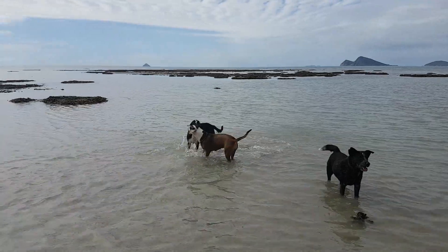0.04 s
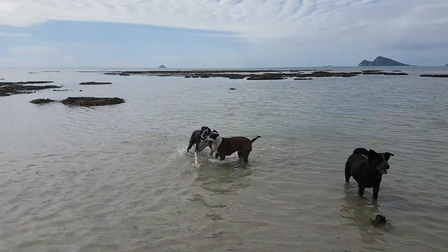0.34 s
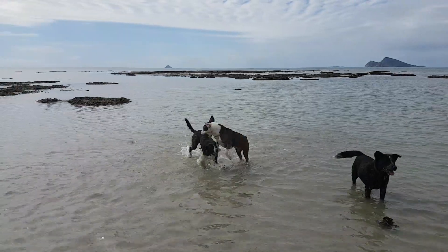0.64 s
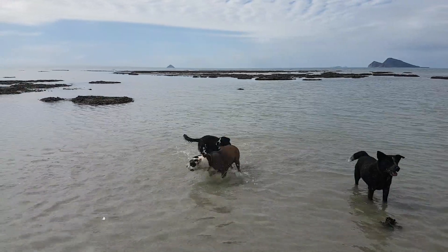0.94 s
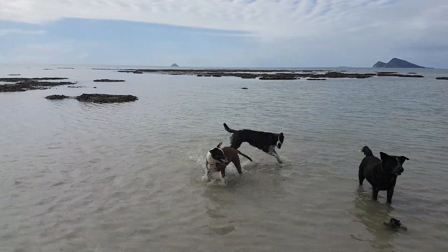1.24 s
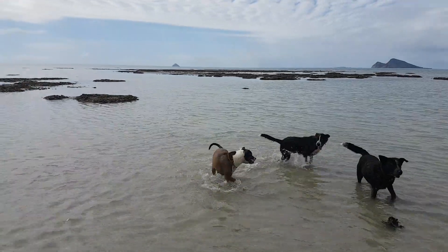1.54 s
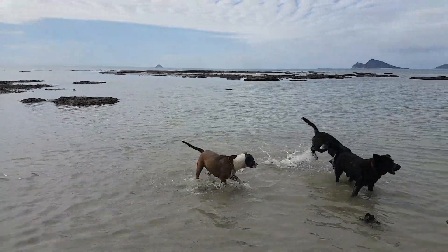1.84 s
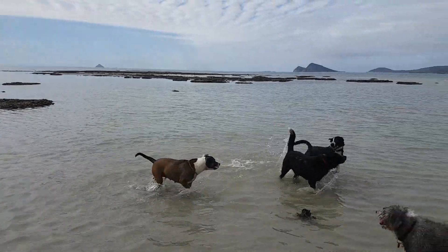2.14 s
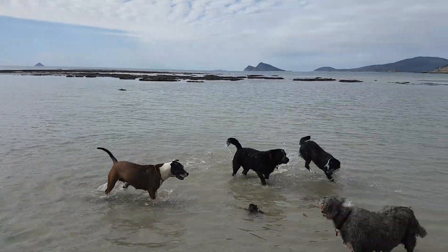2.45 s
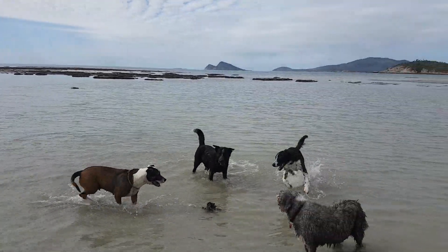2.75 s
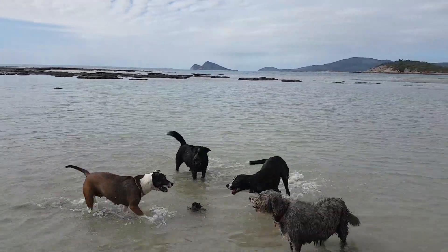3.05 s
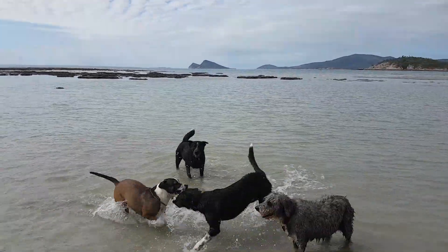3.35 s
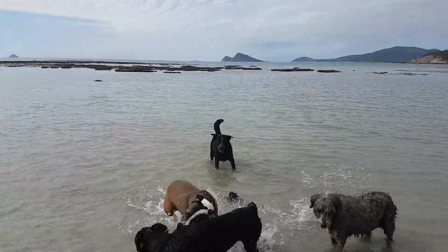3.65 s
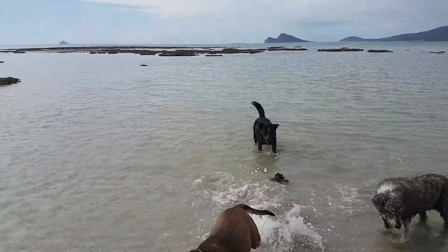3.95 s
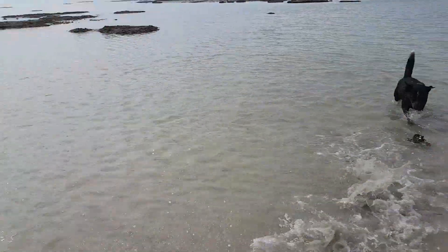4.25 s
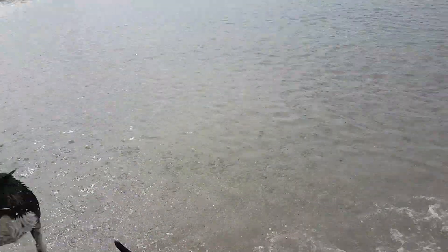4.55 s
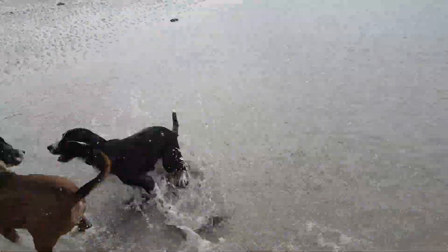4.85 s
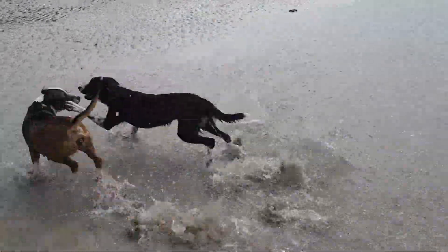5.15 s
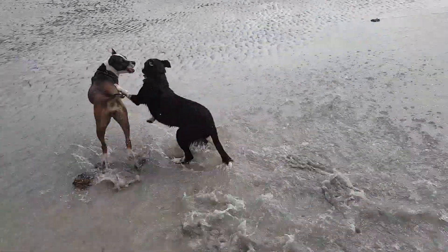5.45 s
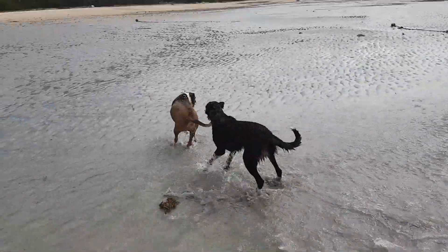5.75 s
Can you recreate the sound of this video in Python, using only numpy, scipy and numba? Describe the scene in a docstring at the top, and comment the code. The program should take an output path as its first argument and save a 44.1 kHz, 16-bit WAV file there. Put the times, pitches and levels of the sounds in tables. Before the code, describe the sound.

Dogs splash through shallow seawater, with two distant barks, then closer romping, whimpers and a yip over a light breeze.

```python
"""Paws plop and splash in shallow seawater some way off, and a dog barks twice. The dogs then romp
close by from right to left, and one whimpers and yips. Each paw punches an air pocket that rings;
lunges push up waves that fall back as bubbles and spray. The voices come from vocal folds buzzing
through the mouth. Behind it all, in open air with no echo, a light breeze buffets the two
microphones and the sea washes faintly."""
import sys
import numpy as np
from scipy import signal
from scipy.fft import rfft, irfft
from scipy.io import wavfile
from scipy.ndimage import uniform_filter1d
from numba import njit

SR = 44100
rng = np.random.default_rng(int(sys.argv[2]) if len(sys.argv) > 2 else 0)


def generate_wav(sig):
    """Save sig (samples, or channels by samples) to the path in sys.argv[1] as 16-bit PCM at SR."""
    pcm = np.round(np.clip(np.atleast_2d(sig).T, -1, 1) * 32767).astype(np.int16)
    wavfile.write(sys.argv[1], SR, pcm)


N = 264600
TIME = np.arange(N) / SR
TOP_HZ = 16000


# A bark starts hoarse, locks into a clean climbing tone, cracks, catches briefly and rattles away.
# Each row: times in seconds of the start, lock, crack, mouth closing and end; climb length in seconds,
# pitch after the climb in Hz, level in dB, fade in dB per second, dip at the voice's flip in dB,
# crack length in seconds; after the crack, roughness from 0 to 1, bite in dB and lift of the lowest
# tone in dB; that tone's further lift in dB as the mouth closes.
BARK_SHAPES = [(0.372, 0.409, .483, 0.519, 0.592, 0.0271, 516.4, -6, 39, -4, 0.0307, .85, -3.5, -8, 11),
               (1.123, 1.162, 1.262, 1.289, 1.311, .041, 501.7, -5.5, 82, -12.5, .014, 0.22, 4, 1.5, 22)]

def bark(start, lock, crack, closing, end, climb_s, top_hz, db, fade_db_per_s, dip_db,
         crack_s, tail_rough, bite_db, cracked_lift_db, closed_lift_db):
    """One bark as rows for voice(): slack folds sound low and rough, tight ones high and clean."""
    switch_s, slack_hz, quiet_db = 0.0079, 395, -34.5
    t = TIME[(TIME > start) & (TIME < end)]
    locked = ramp(t, lock - switch_s / 2, switch_s)
    cracked = ramp(t, crack - switch_s / 2, switch_s)
    eased = ramp(t, crack + crack_s - switch_s / 2, switch_s)
    closed = ramp(t, closing, end - closing)
    flip = np.exp(-((t - lock - 0.8 * climb_s) / 0.0039) ** 2)  # the voice flips to its high range
    catch = np.exp(-((t - crack - crack_s) / 0.0054) ** 2)  # the folds briefly buzz cleanly again

    rough = 1 - locked + 0.06 * (locked - cracked)
    rough += np.sqrt(tail_rough) * (cracked - eased) + tail_rough * eased
    rough *= 1 - catch

    creep_hz = 315 * np.clip(t - lock - climb_s, 0, crack - lock - climb_s)
    sag_hz = 2800 * tail_rough * np.maximum(t - crack, 0)
    climb_hz = (top_hz - slack_hz) * ramp(t, lock, climb_s)
    hz = np.maximum(slack_hz + climb_hz + creep_hz - sag_hz, slack_hz)
    slack = np.clip((top_hz - hz) / (top_hz - slack_hz), 0, 1)

    held_db = db - 6 * (1 - locked) - fade_db_per_s * np.maximum(t - lock, 0)
    held_db += dip_db * flip + 5.5 * catch
    level_db = quiet_db + (held_db - quiet_db) * (ramp(t, start, 0.023) - closed)
    lift_db = -12 + 22 * slack * np.sqrt(np.abs(rough)) + 14 * flip
    lift_db += cracked_lift_db * cracked + closed_lift_db * closed
    return np.column_stack([t, hz, level_db, lift_db, rough, bite_db * cracked])


# How an open mouth shapes the voice. Each row: frequency in Hz, boost or cut in dB.
OPEN_MOUTH_TONE = [(150, -45), (360, -30), (440, -10), (510, 18), (630, -2), (870, 11.5), (1060, 2.5),
                   (1180, -24), (1310, -8.5), (1520, -7), (1750, -26), (2170, -25), (2600, -38),
                   (3200, -48), (3660, -31.5), (4300, -50), (6000, -51), (7300, -37), (9500, -62)]

def barks():
    """Two open-mouthed barks, a little to the right."""
    return sum(voice(bark(*row), OPEN_MOUTH_TONE, lag_s=0.00023,
                     jitter=0.087, shimmer=0.58, rasp=1.15, hiss_db=-28.5) for row in BARK_SHAPES)


# Short soft calls. Each row: start in seconds, length in seconds, pitch in Hz, slide in Hz per second,
# level in dB, level change in dB, lift of the lowest tone in dB, roughness from 0 to 1.
WHIMPER_CALLS = [(4.137, 0.092, 393.4, -330, -21, -11.5, -16, 0.08),
                 (4.954, 0.14, 1360, -620, -40, 12, 3, 0.3), (5.494, .11, 275.3, 93, -31, 1.5, -20, 0.6)]

def whimpers():
    """Each whimper is one straight slide in pitch and level, a little to the left."""
    out = 0
    for start, seconds, hz, slide, db, change_db, lift_db, rough in WHIMPER_CALLS:
        rows = [(start, hz, db, lift_db, rough, 0),
                (start + seconds, hz + slide * seconds, db + change_db, lift_db, rough, 0)]
        out += voice(rows, OPEN_MOUTH_TONE, lag_s=-0.00013,
                     jitter=0.15, shimmer=0.9, rasp=0.53, hiss_db=-37)
    return out


# The path of one yip. Each row: time in seconds, pitch in Hz, level in dB.
YIP_PATH = [(5.361, 221.6, -26), (5.384, 306.7, -24), (5.398, 361.5, -13), (5.407, 394, -12.5),
            (5.413, 410, -20.5), (5.419, 435.4, -9.5), (5.441, 493, -10.5), (5.446, 486, -27),
            (5.468, 406, -28.5), (5.48, 390.0, -34)]
# How a closed mouth shapes the voice. Each row: frequency in Hz, boost or cut in dB.
CLOSED_MOUTH_TONE = [(120, -17), (260, 3), (480, 9), (680, -19), (900, -10), (1300, -7), (1700, -33),
                     (3000, -54)]

def yip():
    """A closed-mouthed yip rises and falls back; the louder it gets, the cleaner it sounds."""
    top_db = max(db for _, _, db in YIP_PATH)
    lift_db = 5
    rows = [(s, hz, db, lift_db, 0.02 + 0.16 * (top_db - db), 0) for s, hz, db in YIP_PATH]
    return voice(rows, CLOSED_MOUTH_TONE, lag_s=-0.0002,
                 jitter=0.078, shimmer=0.26, rasp=0.42, hiss_db=-37)


# The hiss of air forced past the teeth. Each row: frequency in Hz, boost or cut in dB.
TEETH_TONE = [(1500, -9.5), (2500, 2), (3200, -16), (7500, -16), (10000, -28), (12000, -20), (16000, -28)]

def voice(rows, mouth, lag_s, jitter, shimmer, rasp, hiss_db):
    """Vocal folds buzz through the mouth. Roughness shakes pitch (jitter) and level (shimmer)."""
    hz, db, lift_db, rough, bite_db = curves(rows)
    on = np.flatnonzero((TIME > rows[0][0]) & (TIME < rows[-1][0]))
    shaky_hz = hz * (1 + (jitter * rough + 0.0087) * wander(560))
    phase = 2 * np.pi * np.cumsum(shaky_hz[on]) / SR
    # harmonics are tones at 1, 2, 3.. times the pitch; bite weakens the second and lifts those above
    lifts = [lift_db[on], -bite_db[on]] + [bite_db[on]] * 24
    sizes = [gain_at(k * hz[on], mouth) * amp(lift) for k, lift in enumerate(lifts, 1)]
    tone = sum(size * np.sin(k * phase) for k, size in enumerate(sizes, 1))
    tone /= np.sqrt(sum(size ** 2 for size in sizes) / 2)
    rattle = 0.7 * np.cos(phase / 3)  # every third cycle comes stronger
    tone *= 1 + rough[on] * (shimmer * wander(295)[on] + rattle)
    puffs = rng.standard_normal((2, len(on))) * (1 + np.cos(phase))  # air escapes once a cycle
    breath = unit(band(colour(puffs[0], mouth), 550, 3100, order=2))
    call = steady(tone + rasp * rough[on] * breath, 0.012)[0]
    effort = amp((db[on] - db[on].max()) / 2)
    hiss = unit(colour(puffs, TEETH_TONE)) * amp(hiss_db) * effort * (1 + 2 * rough[on])
    out = np.zeros((2, N))
    out[:, on] = (place(call, lag_s) + hiss) * amp(db[on]) * signal.windows.tukey(len(on), 0.06)
    return out


# Paws plunging in. Each row: start in seconds, plop level in dB, pitch in Hz, relative splash in dB.
PAW_PLUNGES = [(0.119, -31, 615, -27.5), (0.219, -20, 640, -36), (0.709, -22, 540, -42),
               (1.047, -17, 556, -46), (1.064, -14, 530, -27), (1.444, -30, 640, -36),
               (1.528, -24, 1094, -41), (1.592, -23, 670, -35), (1.639, -22, 510, -37),
               (1.713, -26, 510, -54), (1.762, -29.5, 754, -33), (1.869, -24.5, 634, -32),
               (2.015, -26, 713, -46), (2.05, -28, 670, -45), (2.17, -21, 610, -44), (2.21, -18, 544, -34),
               (2.254, -25, 547, -44), (2.518, -15.5, 678, -34), (2.613, -12.5, 600, -21.5),
               (2.737, -15.5, 577, -45), (2.974, -20.5, 630, -27), (3.013, -17.5, 730, -22),
               (3.032, -17.5, 620, -37), (3.148, -20.5, 576, -20.5), (3.27, -14.5, 627, -34),
               (3.333, -18.5, 610, -21), (3.513, -11, 1390, -24), (3.565, -13.5, 693, -32),
               (3.778, -14, 695, -18.5), (3.859, -11, 800, -17), (3.932, -11.5, 690, -17.5),
               (3.976, -16.5, 382, -15), (4.019, -19, 353, -24), (4.068, -14.5, 623, -19),
               (4.16, -8.5, 813, -15), (4.22, -10, 378, -19), (4.411, -21, 440, -8), (4.532, -16, 373, -18),
               (4.673, -16.5, 298, -26), (4.714, -9.5, 444, -29), (4.826, -21, 506, -27),
               (5.483, -15.5, 584, -41), (5.852, -20.5, 362, -27), (5.901, -15.5, 397, -25)]

def paws():
    """A paw opens an air pocket that plops and breaks into bubbles, with a brighter splash around it."""
    start, db, hz, splash_db = np.transpose(PAW_PLUNGES)
    plop = bubbles(start + 0.0012, hz, 13, amp(db), life_spread=0.13)
    breakup = burst(start + 0.00285, db - 2.5, hz, octaves=0.45, seconds=0.01798, cycles=14.5, count=8)
    splash = burst(start, splash_db + 3, hz=1600, octaves=1, seconds=0.03, cycles=7.2, count=24)
    return band(plop + breakup + splash, 155, 9000)


# Flung water landing. Each row: start in seconds, relative level in dB.
WATER_SMACKS = [(0.609, -17.5), (0.907, -17), (0.948, -18), (2.622, -17), (3.588, -12), (3.663, -9),
                (3.755, -7), (3.8594, -5), (4.0576, -4), (4.2027, -9), (4.263, -7), (4.4494, -1.5),
                (4.5047, -5), (4.773, -10), (5.245, -8.5), (5.293, -13.5)]

def smacks():
    """Sheets of water slap down as short showers of tiny ringing bubbles."""
    start, db = np.transpose(WATER_SMACKS)
    showers = burst(start, db - 7, hz=5500, octaves=1.51, seconds=0.016, cycles=9.7, count=120)
    return band(showers, 1200, TOP_HZ)


# Single large drops. Each row: start in seconds, level in dB, pitch in Hz.
LARGE_DROPS = [(0.1217, -31, 1870), (3.045, -20.5, 1880), (3.1509, -22, 1980), (3.942, -17.5, 2700),
               (4.16, -12, 1400), (4.701, -14.5, 2810)]

def drips():
    """Each large drop traps a bubble that pings."""
    start, db, hz = np.transpose(LARGE_DROPS)
    return bubbles(start, hz, 48, amp(db), glide=0.076, life_spread=0.1)


# Water kept moving by the dogs. Each row: time in seconds, relative slosh and spray levels in dB.
RESTLESS_WATER = [(0, -43, -43), (.55, -38.5, -43), (.68, -43.5, -48), (.8, -41, -47.5), (.98, -44, -43),
                  (1.4, -44.5, -47.5), (1.72, -46, -48.5), (2.15, -41, -44.5), (2.42, -38.5, -40),
                  (2.92, -38, -40), (3.09, -44, -43), (3.2, -35.5, -38.5), (3.72, -35, -34.5),
                  (4.32, -30.5, -28), (4.53, -30.5, -27), (5.0, -30.5, -31.5), (5.65, -35, -35.5),
                  (6, -35.5, -45.5)]
# Waves from lunges. Each row: start and length in seconds, relative slosh and spray levels in dB.
LUNGE_WAVES = [(0.11, 0.15, -33.5, -44), (0.787, 0.12, -41, -45), (2.143, 0.25, -33.5, -64),
               (3.368, 0.063, -33.5, -35.5), (3.547, 0.16, -38.5, -34.5), (3.953, 0.13, -26.5, -38),
               (4.174, 0.098, -26, -28), (4.356, 0.12, -27.5, -26.5), (4.46, 0.19, -42, -28.5),
               (4.652, 0.16, -28, -30), (5.622, 0.08, -42, -44)]

def stirring():
    """Slosh and spray levels in dB: restless water, waves and the wake of each paw add their power."""
    power = amp(curves(RESTLESS_WATER)) ** 2
    for start, seconds, slosh_db, spray_db in LUNGE_WAVES:
        wave = np.sin(np.pi * ramp(TIME, start, seconds))
        power += np.outer(amp([slosh_db, spray_db]), wave) ** 2
    start, plop_db, _, splash_db = np.transpose(PAW_PLUNGES)
    kicks = np.zeros((2, N))
    kicks[:, (start * SR).astype(int)] = amp([plop_db - 19.5, splash_db - 14.5]) ** 2
    fade_s = 0.039
    wakes = signal.lfilter([1], [1, -np.exp(-2 / (fade_s * SR))], kicks)
    return 10 * np.log10(power + wakes)


# How the water sounds far off and close by. Each row: frequency in Hz, boost or cut in dB.
FAR_TONE = [(200, -15.5), (360, -22.5), (520, -8.5), (660, -9), (870, -15.5), (1900, -9.5), (2200, -17),
            (4400, -19), (5200, -23.5), (7000, -24), (9500, -29), (12400, -24), (16000, -35)]
NEAR_TONE = [(150, -1.5), (320, 3), (760, 3), (1450, -3.5), (1800, -7), (2600, -7), (3900, -15),
             (7000, -20.5), (9600, -28), (13000, -24)]

def churn():
    """Big bubbles slosh, drops patter and spray crackles; the tone changes as the dogs come near."""
    slosh_db, spray_db = stirring()
    near = np.interp(TIME, [2.2, 3.6], [0, 1])
    alongside = np.interp(TIME, [3.6, 4.0], [0, 1])  # the deepest slosh comes only beside the dogs
    sheets = surges(per_second=34, fade_s=0.015, depth_db=3)  # spray comes down in sheets
    slosh = bubble_cloud(243.5, 1323, cycles=16.7, scatter_db=2, wash_db=-13, count=3500)
    patter = bubble_cloud(1167, 4487, cycles=26.8, scatter_db=3.5, wash_db=-2.5, count=14000)
    spray = bubble_cloud(3700, 16200, cycles=16, scatter_db=5.5, wash_db=5.5, count=30000)
    layers = [(band(slosh, 170, 1400), alongside, amp(slosh_db + 0.5)),
              (band(patter, 1150, 4420), near, amp(spray_db + 0.5) * np.sqrt(sheets)),
              (band(spray, 4100, SR / 2), near, amp(spray_db - 5.5 + 2.84 * near) * sheets)]
    out = 0
    for cloud, close, gain in layers:
        water = (1 - close) * unit(colour(cloud, FAR_TONE)) + close * unit(colour(cloud, NEAR_TONE))
        out += steady(water, 0.12) * gain
    return out * surges(per_second=26, fade_s=0.039, depth_db=1.9)


def surges(per_second, fade_s, depth_db):
    """Lumps of water land at random; each lifts the level at once and lets it fade."""
    lumps = (rng.random(N) < per_second / SR) * rng.random(N)
    fading = signal.lfilter([1], [1, -np.exp(-1 / (fade_s * SR))], lumps)
    return unit(amp(depth_db * np.tanh(unit(fading - fading.mean()))))


def bubble_cloud(low_hz, high_hz, cycles, scatter_db, wash_db, count):
    """A steady rain of bubbles, a few loud among many quiet, over a wash of noise."""
    when, pitch, chance = rng.random((count, 3)).T
    hz = low_hz * (high_hz / low_hz) ** pitch
    size = amp(scatter_db * np.minimum(-np.log(1 - chance), 4)) * hz / high_hz
    cloud = unit(bubbles(when * N / SR, hz, cycles, size))
    wash = unit(band(rng.standard_normal((2, N)), low_hz, high_hz))
    return cloud + amp(wash_db) * wash


def burst(start, db, hz, octaves, seconds, cycles, count):
    """Each impact sheds a cluster of bubbles around a pitch; late ones are weaker."""
    late, pitch, size = rng.random((len(start), count, 3)).transpose(2, 0, 1)
    size = size * np.exp(-2 * late) * amp(db)[:, None]
    bubble_hz = np.minimum(np.reshape(hz, (-1, 1)) * 2 ** (octaves * (2 * pitch - 1)), TOP_HZ)
    when = start[:, None] + seconds * late
    return bubbles(when.ravel(), bubble_hz.ravel(), cycles, size.ravel(),
                   lag_spread=0.00009, pan_spread=0.055)


def bubbles(start, hz, cycles, size, glide=0.21, lag_spread=0.00008, pan_spread=0.025, life_spread=0.38):
    """Bubbles of uneven life, scattered around the dogs, who cross from right to left."""
    life, lag, pan = rng.standard_normal((len(start), 3)).T
    right_lag_s = np.interp(start, [2.2, 4.2], [-0.00006, 0.0001]) + lag * lag_spread
    return ring(start, hz, cycles * np.exp(life * life_spread), size, right_lag_s, pan * pan_spread, glide)


@njit
def ring(start, hz, cycles, size, right_lag_s, pan, glide):
    """A bubble rings as a pure tone that swells within one cycle, rises in pitch and dies away."""
    out = np.zeros((2, N))
    for k in range(len(start)):
        step = hz[k] / SR  # cycles per sample
        life = cycles[k] / step
        rise = np.exp(2j * np.pi * step * glide / life)
        for channel, side in enumerate((-1, 1)):
            onset = (start[k] + side * right_lag_s[k] / 2) * SR
            first = max(int(onset) + 1, 0)
            # a point circles and spirals inward; its height traces the fading tone
            turn = np.exp(2j * np.pi * step - 5.5 / life)
            point = size[k] * (1 + side * pan[k]) * np.exp(2j * np.pi * step * (first - onset))
            for i in range(first, min(int(onset + life), N)):
                out[channel, i] += min((i - onset) * step, 1.) * point.imag
                point *= turn
                turn *= rise
    return out


# The strength of the breeze. Each row: time in seconds, relative level in dB.
GUST_LEVELS = [(0, -38), (.3, -33), (.8, -41), (1.8, -46), (2.2, -41), (3.6, -44.5), (4.6, -36.5),
               (4.85, -26.5), (5.22, -30.5), (5.55, -39), (5.95, -29.5)]
# Its low rumble. Each row: frequency in Hz, boost or cut in dB.
BREEZE_TONE = [(20, -23), (70, 1.5), (140, 1), (250, -2), (1200, -32)]

def breeze():
    """Gusts buffet both microphones, making a separate rumble in each."""
    gust_db, = curves(GUST_LEVELS)
    rumble = unit(colour(rng.standard_normal((2, N)), BREEZE_TONE))
    return rumble * amp(gust_db - 1 + 1.4 * wander(30))


# The wash of the distant sea. Each row: frequency in Hz, boost or cut in dB.
SEA_TONE = [(60, -54), (600, 1.5), (2200, -7), (5000, -21), (9000, -46), (16000, -18)]

def sea():
    """The sea is a faint, gently wavering noise, nearly the same on both sides."""
    noise = rng.standard_normal((2, N)) + 6.1 * rng.standard_normal(N)
    return unit(colour(noise, SEA_TONE)) * amp(-50.5 + wander(4.1))


def amp(db):
    """Turn decibels into a multiplier."""
    return 10 ** (np.asarray(db) / 20)


def unit(x):
    """Scale to an average power of 1."""
    return x / np.sqrt(np.mean(x ** 2) + 1e-18)


def ramp(t, start, seconds):
    """Rise from 0 to 1 over the given time."""
    return np.clip((t - start) / seconds, 0, 1)


def curves(rows):
    """Join rows that begin with a time into one curve for each other column."""
    times, *columns = np.transpose(rows)
    return [np.interp(TIME, times, column) for column in columns]


def gain_at(hz, tone):
    """Read a tone table's multiplier at the given frequencies."""
    table_hz, db = np.transpose(tone)
    return amp(np.interp(np.log(hz + 1), np.log(table_hz), db))


def colour(x, tone):
    """Boost and cut frequencies as a tone table says."""
    size = 4096
    cepstrum = irfft(np.log(gain_at(np.arange(size // 2 + 1) * SR / size, tone)))
    # fold the second half onto the first, so the filter never rings ahead of the sound
    cepstrum[1:size // 2] *= 2
    cepstrum[size // 2 + 1:] = 0
    response = irfft(np.exp(rfft(cepstrum)))
    return signal.fftconvolve(np.atleast_2d(x), response[None], axes=1)[:, :x.shape[-1]]


def band(x, low_hz, high_hz, order=3):
    """Keep what lies between two frequencies."""
    edges = [low_hz, min(high_hz, SR / 2 - 100)]
    return signal.sosfilt(signal.butter(order, edges, "band", fs=SR, output="sos"), x)


def wander(rate):
    """A smooth random curve of typical size 1, changing about rate times a second."""
    return unit(signal.sosfilt(signal.butter(2, rate / 2, fs=SR, output="sos"), rng.standard_normal(N)))


def steady(x, seconds):
    """Even out level changes slower than the given time."""
    power = uniform_filter1d(np.mean(x ** 2, axis=0), int(seconds * SR))
    return x / np.sqrt(np.abs(power) + 1e-12)


def place(x, lag_s):
    """Give a sound a direction: the left microphone hears it lag_s seconds late."""
    t = TIME[:len(x)]
    return np.array([np.interp(t - lag_s, t, x), x])


def scene():
    """Add up the voices, the splashing and the background."""
    return barks() + whimpers() + yip() + churn() + paws() + drips() + smacks() + breeze() + sea()


# How the two microphones differ. Each row: frequency in Hz, left level minus right level in dB.
LEFT_OVER_RIGHT = [(200, 2), (480, -1.5), (1100, 1.5), (2400, 1.5), (4200, -2.5), (8000, 0), (12000, 4.5)]

def record(dry):
    """Each microphone colours the sound its own way; loud peaks are rounded and the top treble is cut."""
    left = colour(dry[0], [(hz, db / 2) for hz, db in LEFT_OVER_RIGHT])
    right = colour(dry[1], [(hz, -db / 2) for hz, db in LEFT_OVER_RIGHT])
    stereo = np.vstack([left, right])
    rounded = stereo / (1 + stereo ** 8) ** (1 / 8)
    return signal.sosfilt(signal.ellip(10, 0.2, 80, TOP_HZ, fs=SR, output="sos"), rounded)


dry = scene()
out = record(dry)
generate_wav(out)
```